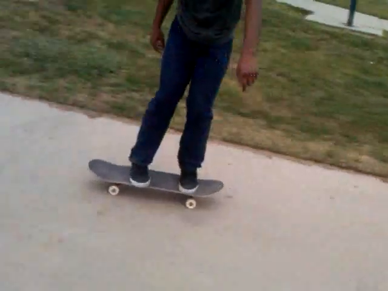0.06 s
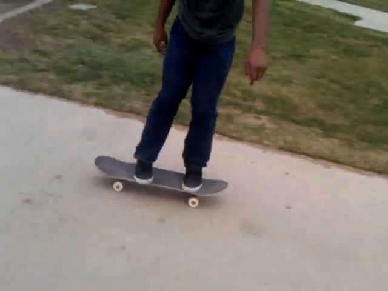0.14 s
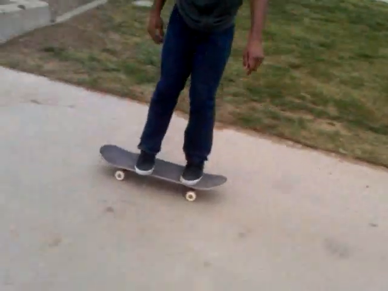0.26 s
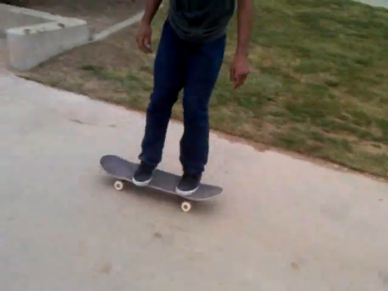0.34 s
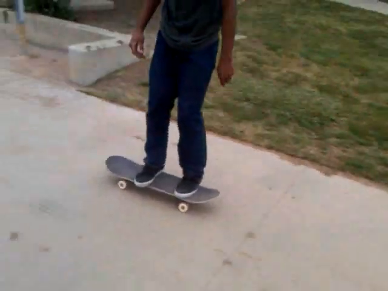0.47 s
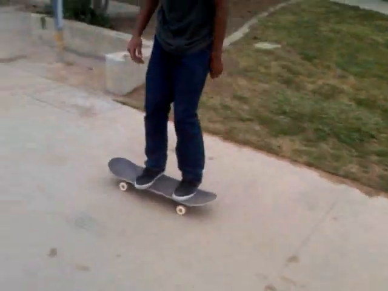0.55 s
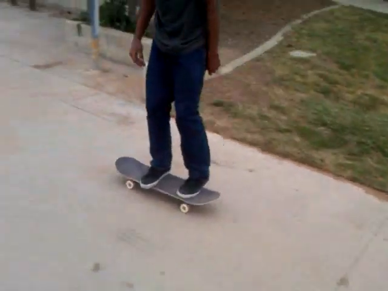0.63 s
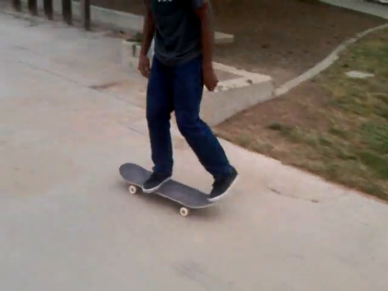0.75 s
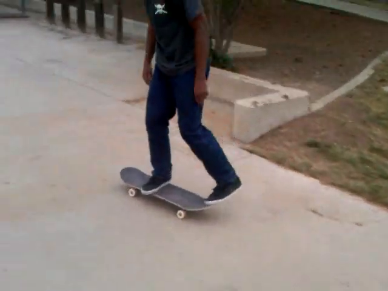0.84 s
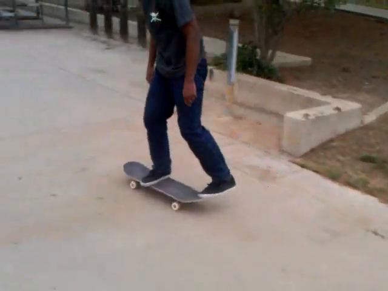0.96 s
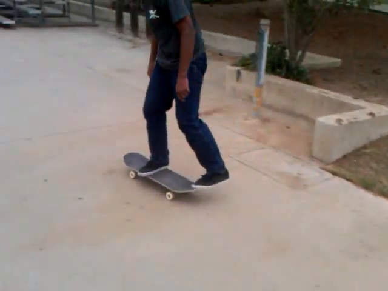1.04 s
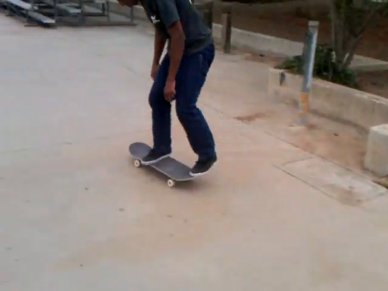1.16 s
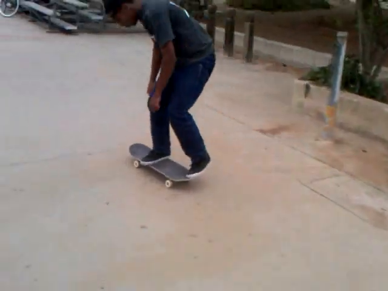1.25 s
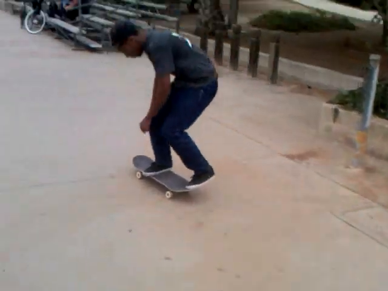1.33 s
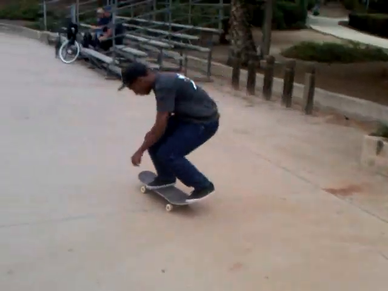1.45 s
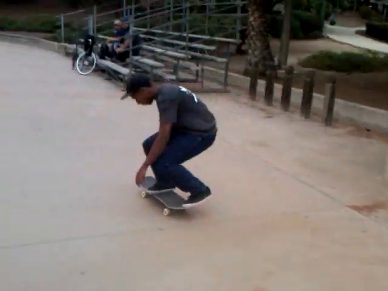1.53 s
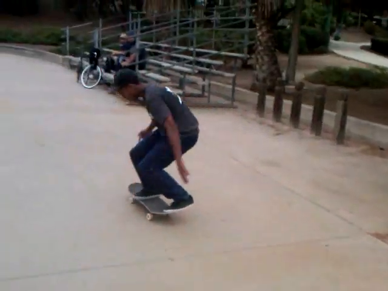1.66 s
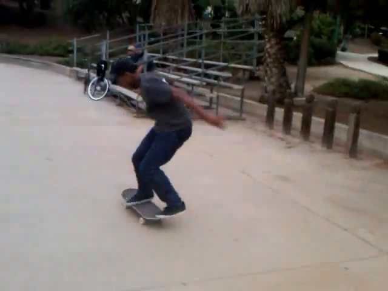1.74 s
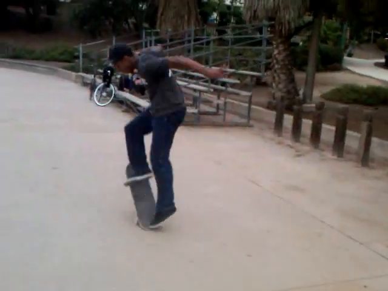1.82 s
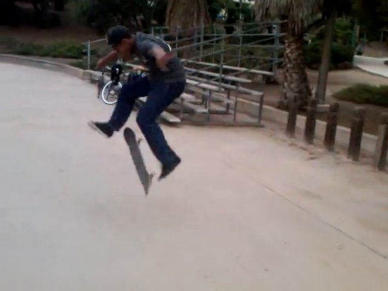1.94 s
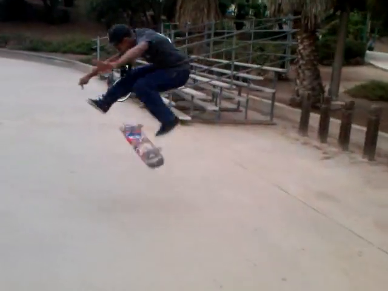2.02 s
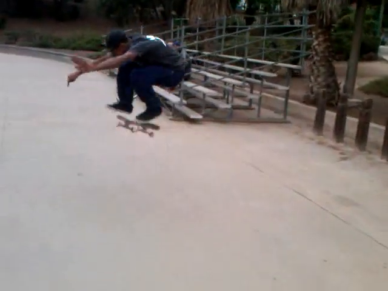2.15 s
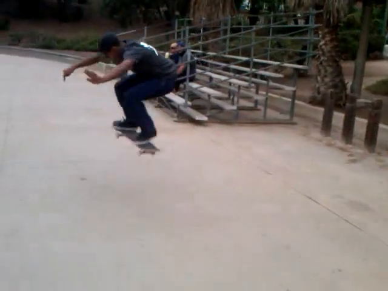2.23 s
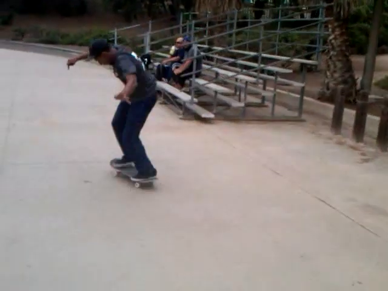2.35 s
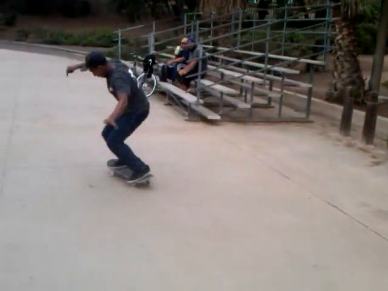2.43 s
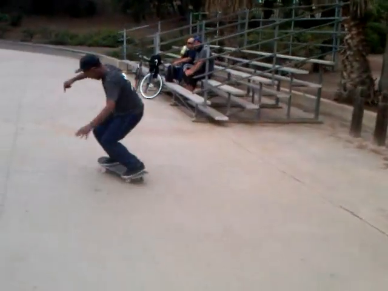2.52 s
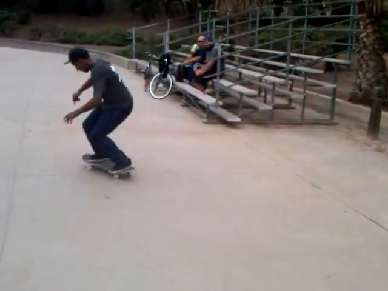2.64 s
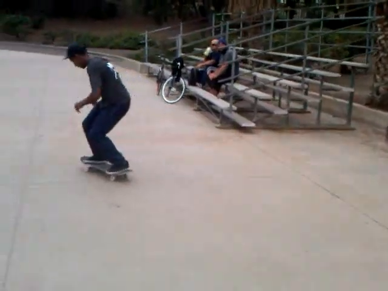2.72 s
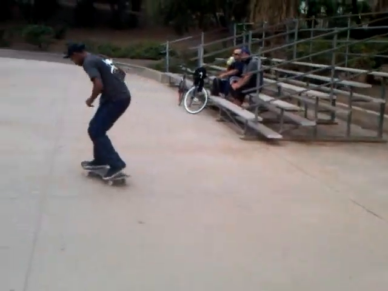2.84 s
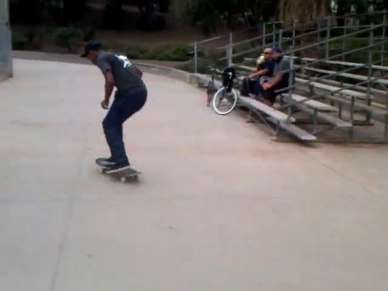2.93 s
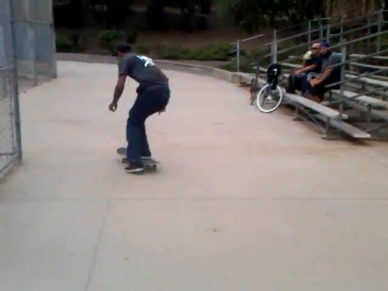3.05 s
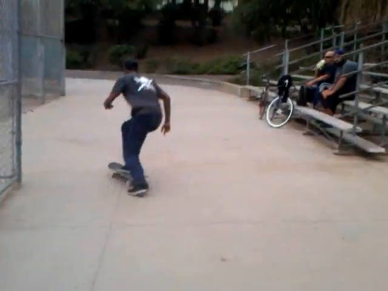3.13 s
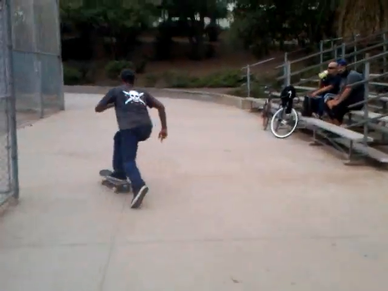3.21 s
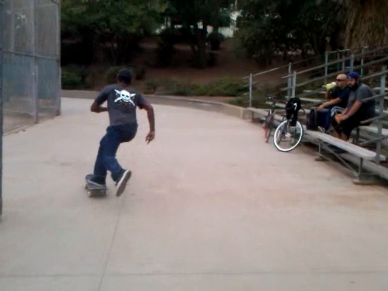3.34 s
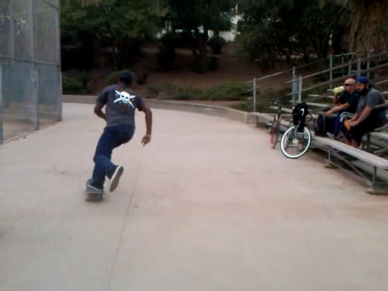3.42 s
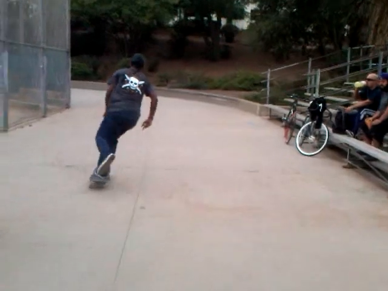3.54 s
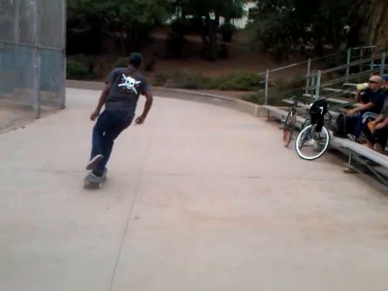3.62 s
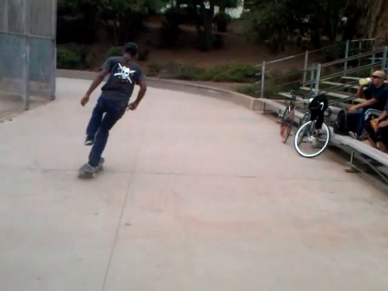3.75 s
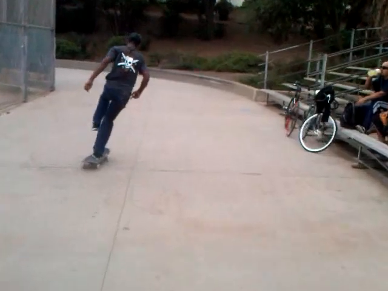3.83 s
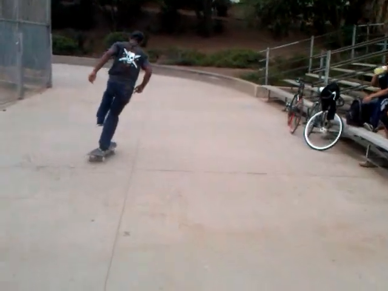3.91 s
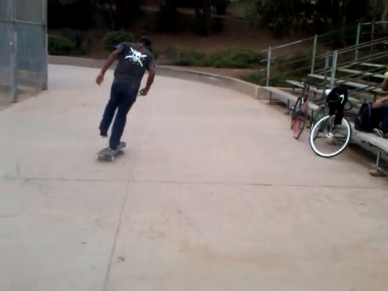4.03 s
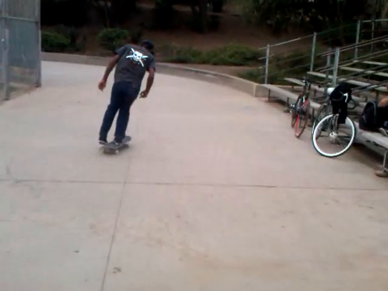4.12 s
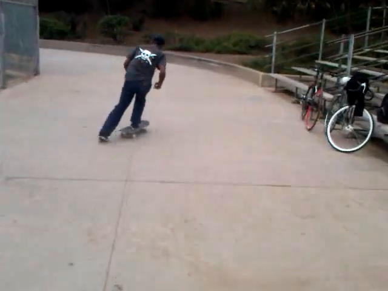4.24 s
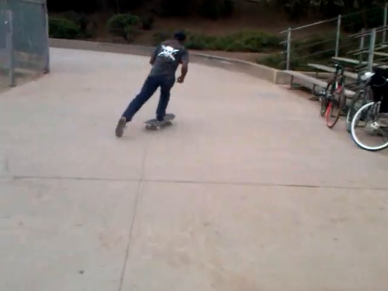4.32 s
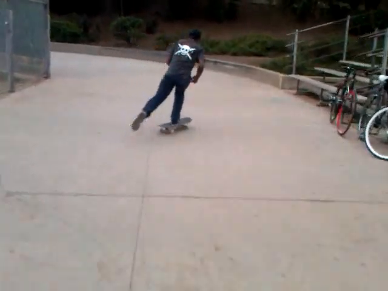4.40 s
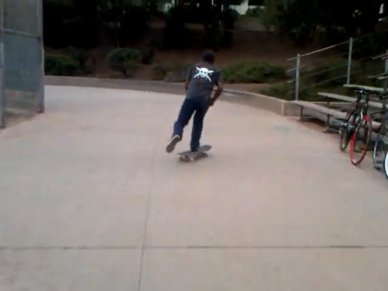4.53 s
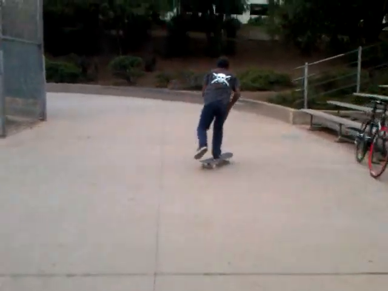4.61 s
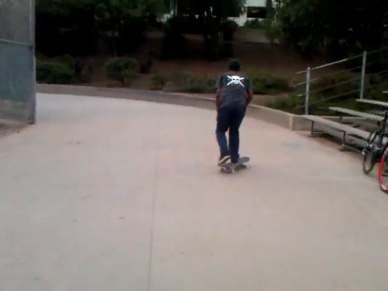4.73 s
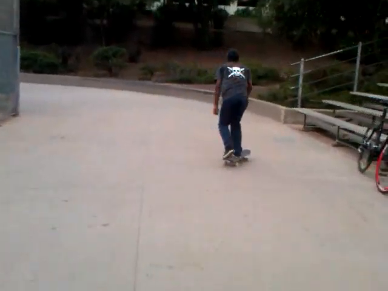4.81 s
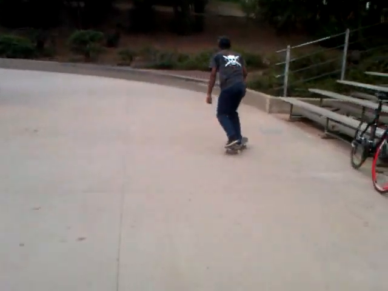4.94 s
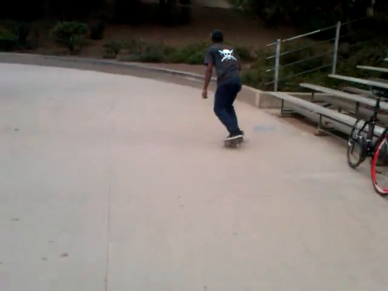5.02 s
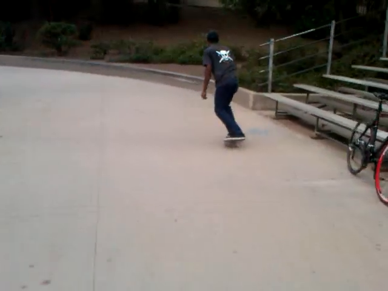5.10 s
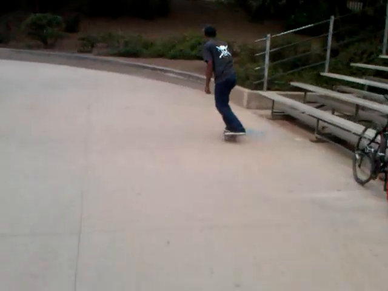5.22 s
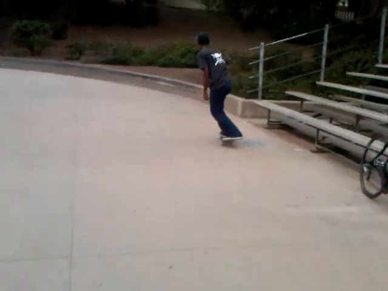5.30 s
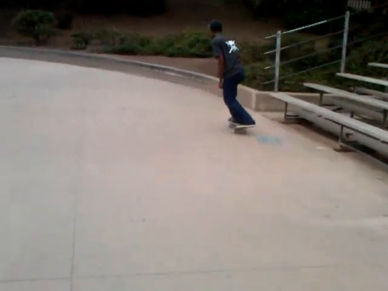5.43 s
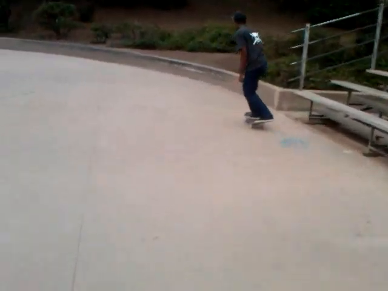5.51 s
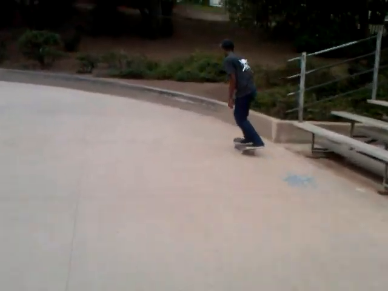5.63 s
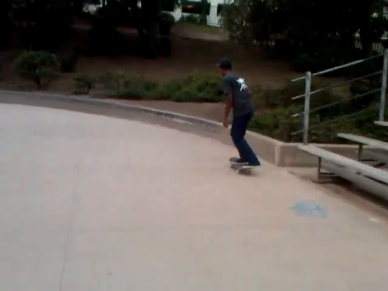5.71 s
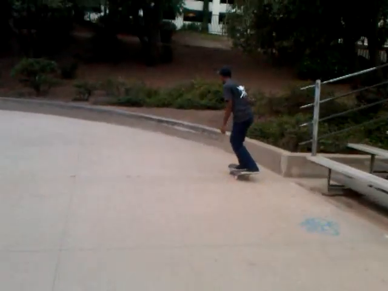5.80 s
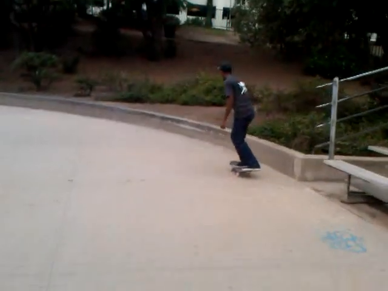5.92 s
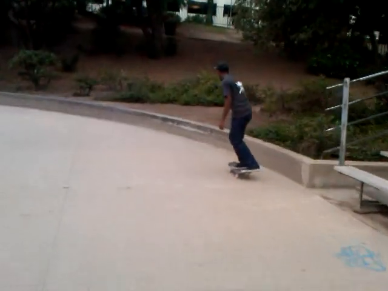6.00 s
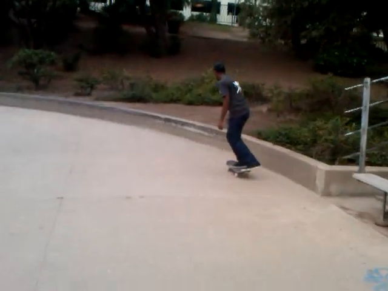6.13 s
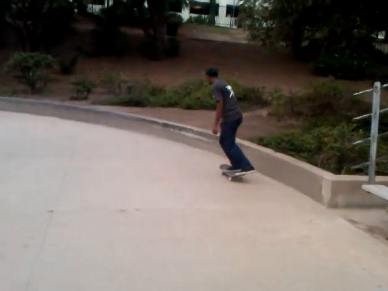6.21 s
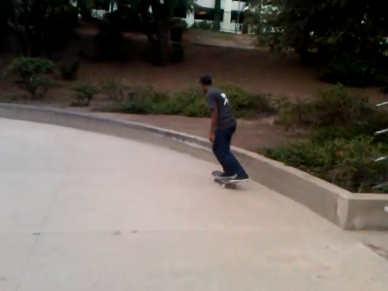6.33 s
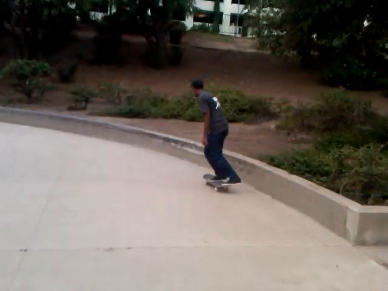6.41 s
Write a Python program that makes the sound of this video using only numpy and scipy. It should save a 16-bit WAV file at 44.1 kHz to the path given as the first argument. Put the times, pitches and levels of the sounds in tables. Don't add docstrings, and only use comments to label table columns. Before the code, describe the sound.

A skateboard's wheels grind quietly over sandy slabs, with a few near knocks and loose metal jingles. A dry crack of the tail, a second of thin whirr, then a cluster of wood and metal clacks as it lands, slapping off nearby walls. Foot scrapes and stronger, louder rumbling follow, joints knocking irregularly. Small camera microphone outdoors, faint low breeze, muffled and slightly broken-up treble.

```python
import sys
import numpy as np
from scipy import signal
from scipy.fft import rfft, irfft
from scipy.io import wavfile
from scipy.ndimage import uniform_filter1d

SR = 44100
rng = np.random.default_rng(int(sys.argv[2]) if len(sys.argv) > 2 else 0)


def makeup_ratio(level_db):
    decades = np.asarray(level_db, float) / 20
    return 10 ** decades


def file_out(sig):
    cols = np.atleast_2d(sig).T
    lim = np.clip(cols, -1, 1)
    pcm = np.round(lim * 32767).astype(np.int16)
    wavfile.write(sys.argv[1], SR, pcm)


N = 284886
TIME = np.arange(N) / SR


def evened(x):
    return x / np.sqrt(np.mean(x ** 2) + 1e-20)


def peaked(x):
    return x / abs(x).max()


def add(mix, s, sound):
    part = mix[round(s * SR):][:len(sound)]
    part += sound[:len(part)]


def coloured(x, points):
    hz, db = np.transpose(points)
    bins = np.fft.rfftfreq(len(x), 1 / SR)
    gain_db = np.interp(np.log(bins + 1), np.log(hz), db, -90, -90)
    return evened(irfft(rfft(x) * makeup_ratio(gain_db), len(x)))


def body(x, modes):
    out = np.zeros(len(x))
    for k, (hz, width, db) in enumerate(modes):
        r = np.exp(-np.pi * 1.5 * width / SR)
        pole = [1, -r * np.exp(2j * np.pi * hz / SR)]
        ring = signal.lfilter([(1 - r) ** 2], np.convolve(pole, pole), x).real
        out += (-1) ** k * makeup_ratio(db) * ring
    return evened(out)


def drift(per_s):
    slow = signal.butter(2, per_s, fs=SR, output="sos")
    return evened(signal.sosfilt(slow, rng.standard_normal(N)))


def grit(per_s, spread_db, bumps_db):
    size = makeup_ratio(spread_db * np.minimum(rng.exponential(1, N), 4)) * rng.choice([-1., 1.], N)
    struck = rng.random(N) < per_s / SR
    return size * struck * makeup_ratio(bumps_db)


# (middle [s], length [s], trucks [dB], deck [dB])
SWELLS_AND_DIPS = [(0, 0.11, -1.5, 7), (0.238, 0.033, -1, 7.5), (1.306, 0.17, 6.5, 4), (1.4, 0.072, 11.5, 0),
                   (1.616, 0.18, 13.5, 1.5), (1.941, 0.083, 4.5, 8), (2.124, 0.1, 14.5, 0.5),
                   (3.2, 0.12, -3.5, 4), (2.8, 0.091, 2, -1), (4.62, .1, 4, -0.5), (5.66, 0.063, 1.5, 2),
                   (6.13, 0.066, 2, 0), (.76, 0.11, -1.5, -2), (3.481, 0.091, -0.5, 5.5),
                   (3.894, 0.048, -1, -1), (4.42, 0.11, 4, -2), (5.152, 0.15, 5, 1.5), (5.43, 0.045, 0, 2),
                   (6.227, 0.043, 2, -1.5), (6.38, 0.034, -0.5, -0.5)]


def swells_and_dips(column):
    return sum(row[column] * np.exp(-(2 * (TIME - row[0]) / row[1]) ** 2) for row in SWELLS_AND_DIPS)


# (frequency [Hz], width [Hz], level [dB])
DECK_MODES = [(137.4, 23, -9), (214.8, 84, -8), (465.9, 47.6, -1.5), (585.7, 119, -2.5)]
# (frequency [Hz], width [Hz], level [dB])
FLEX_MODES = [(280, 45.4, -4.5), (326, 77.3, -6), (427, 82, -5)]
# (frequency [Hz], width [Hz], level [dB])
UPPER_MODES = [(633, 101, -2.5), (757, 138, -2), (877, 86, -4.5)]


def deck_roar(bumps, stones, deck_db, load):
    wood = body(stones, DECK_MODES[2:]) + makeup_ratio(-11 + 15 * load) * body(stones, FLEX_MODES)
    fine = grit(2000., 2.0, 0.24 * bumps + 0.38 * drift(28.0))
    upper = makeup_ratio(deck_db - 8 + 8.5 * load) * body(fine, UPPER_MODES)
    return makeup_ratio(deck_db - 2.0) * wood + upper


# (frequency [Hz], width [Hz], level [dB])
TRUCK_MODES = [(962, 138, -3.5), (1165, 185, 1), (1374, 118, -3), (1483.6, 71, -1.5), (1638, 150, -9.5)]


def truck_clatter(bumps, truck_db):
    shaken = makeup_ratio(truck_db - 2.0) + rattle(column=2, rel_db=-18.5)
    return shaken * body(grit(2500., 2.2, 0.24 * bumps + 1.9 * drift(25.)), TRUCK_MODES)


def streaks(x, modes):
    out = np.zeros(N)
    for hz, width, db in modes:
        out += makeup_ratio(db + 4 * drift(14.)) * body(x, [(hz, width, 0)])
    return evened(out)


# (frequency [Hz], width [Hz], level [dB])
HUM_SIDE_ON = [(547, 24, -3.5), (661, 30, -1.5), (1178, 40, -9.5)]
# (frequency [Hz], width [Hz], level [dB])
HUM_ROLLING_AWAY = [(338, 24, -2.5), (478, 20, -1), (640, 45, -10), (1169.6, 39, -6)]


def hum(sand, away, deck_db):
    near = (1 - away) * makeup_ratio(-4.5) * streaks(sand, HUM_SIDE_ON)
    far = away * makeup_ratio(-2.5) * streaks(sand, HUM_ROLLING_AWAY)
    spinning = np.interp(TIME, (1.5, 1.56, 2.6, 3.2), (0, 1, 1, 0))
    return makeup_ratio(deck_db) * (near + far) + makeup_ratio(-56) * spinning * body(sand, [(1635, 280, 0)])


# (frequency [Hz], level [dB per Hz])
HISS_SIDE_ON = [(1500, -44.5), (1900, -10), (2240, -2.5), (2650, -7), (3050, -12.5), (3400, -5.5),
                (3860, -8), (4300, -1), (4980, -8.5), (5330, -12), (5700, -10), (6310, -7.5), (7300, -13.5),
                (9000, -44)]
# (frequency [Hz], level [dB per Hz])
HISS_ROLLING_AWAY = [(1120, 2.5), (1900, -7.5), (2030, -14), (2200, -7.5), (2290, -14), (2580, -3.5),
                     (2880, -8.5), (3190, -10.5), (3880, -8), (4250, -12), (5150, -13.5), (6490, -14.5),
                     (7300, -18.5), (9490, -50), (16100, -120)]
# (frequency [Hz], width [Hz], level [dB])
BEARING_WHIRR = [(4340, 370, 0.5), (2630, 200, -2)]


def hiss(sand, away, deck_db, sand_db):
    level = makeup_ratio(-35 + 0.39 * deck_db + sand_db) + rattle(column=3, rel_db=-17.5)
    far = coloured(sand, HISS_ROLLING_AWAY) + makeup_ratio(-15.5) * body(sand, BEARING_WHIRR)
    return level * ((1 - away) * coloured(sand, HISS_SIDE_ON) + away * far)


# (time [s], wheel force [dB], truck looseness [dB], grit on the slab [dB])
ROLLING = [(0, -35, 5.5, -3.5), (0.249, -37, 3.5, -5.5), (.6, -42, 5.5, -6), (.84, -40.5, 2.5, -10.5),
           (0.919, -34, 2, -10), (1.5, -37.5, -2.5, -6), (1.72, -35.5, -8, -11), (1.86, -42.5, 1, -9),
           (2.6, -38.5, -6.5, -6.5), (2.78, -42.5, -6.5, -15), (3.1, -42.5, -2, -10), (3.36, -27, -3, -8),
           (3.58, -35.5, 1, -4.5), (4.3, -31.5, -5.5, -3), (4.66, -21, -3.5, -5.5), (4.95, -28.5, -6.5, -6),
           (5.72, -25, -3, -4.5), (6.46, -31, -2, -7)]
# (time [s], load [0-1])
RIDER_LOAD = [
    (0, 0),
    (.9, 0.28),
    (1.5, 0.63),
    (1.9, 0.62),
    (3.1, 0.81),
    (3.6, 0.98),
    (4.4, 0.72),
    (6.46, 0.79),
]
# (from [s], to [s])
TURN_AWAY = (2.43, 2.4)


def rolling():
    s, *levels = np.transpose(ROLLING)
    deck_db, loose_db, sand_db = (np.interp(TIME, s, column) for column in levels)
    truck_db = deck_db + loose_db + swells_and_dips(column=2)
    deck_db = deck_db + swells_and_dips(column=3)
    load = np.interp(TIME, *np.transpose(RIDER_LOAD))
    away = np.interp(TIME, TURN_AWAY, (0, 1))
    bumps = 1.63 * drift(31.0)
    stones = grit(1500., 1.7, bumps)
    sand = grit(9800.0, 3.76, 0.5 * bumps)
    low = makeup_ratio(-21 + 0.66 * deck_db + 5 * (load - 0.95)) * body(stones, DECK_MODES[:2])
    board = low + deck_roar(bumps, stones, deck_db, load) + truck_clatter(bumps, truck_db)
    return board + hum(sand, away, deck_db) + hiss(sand, away, deck_db, sand_db)


# (frequency [Hz], level [dB per Hz])
BASS_COLOUR = [(12, -39), (20, -2), (92, -5), (120, -7.5), (160, -34), (260, -120)]


def breeze():
    s, force_db = np.transpose(ROLLING)[:2]
    level = makeup_ratio(-34 + 0.48 * np.interp(TIME, s, force_db))
    return level * coloured(rng.standard_normal(N), BASS_COLOUR)


# (time [s], deck peak [dB], thud pitch [Hz])
DULL_KNOCKS = [(0.137, -19, 547), (0.173, -22, 560), (.247, -26, 550), (.309, -24.5, 556),
               (0.417, -27, 510), (.909, -24.5, 545), (1.138, -26, 550), (1.342, -23, 594),
               (1.484, -24, 640), (1.6, -26, 900), (1.6325, -14, 595), (1.64, -19, 430), (1.714, -17, 379),
               (2.957, -36, 676), (3.142, -24.5, 490), (3.198, -21.5, 454), (3.288, -14.5, 596),
               (3.328, -15, 600), (3.39, -9, 553), (3.441, -17.5, 466), (3.54, -22.5, 800),
               (3.861, -23.5, 520), (3.991, -14, 417), (4.028, -33, 447), (4.251, -30, 480),
               (4.515, -16.5, 470), (4.773, -9, 700), (4.778, -11.5, 617), (5.101, -19, 659),
               (5.203, -15, 750), (5.381, -16, 456), (5.616, -16.5, 799), (5.899, -11, 320),
               (6.152, -13, 400), (6.229, -14.5, 428), (6.258, -20.5, 470), (6.377, -16.5, 380),
               (6.404, -10.5, 446), (6.412, -9.5, 450), (4.6, -14.5, 480), (4.627, -11.5, 850),
               (4.68, -9, 850), (5.73, -8, 700), (6.033, -17, 600)]
# (time [s], deck peak [dB], truck ring against deck [dB], tick against deck [dB], thud pitch [Hz])
NEAR_JOINTS = [(0.4702, -20, -9, -25, 590), (0.4793, -12.5, -8, -26.5, 526), (0.523, -25, -20, -23, 635),
               (.595, -25.5, -2, -21.5, 219), (3.9633, -16, 3.5, -22, 675), (3.969, -9.5, -1, -23, 690),
               (4.0732, -16.5, -2.5, -26, 378), (4.0786, -18.5, 1, -24, 453), (4.113, -21.5, 4, -23, 447)]
# (time [s], deck peak [dB], truck ring against deck [dB], tick against deck [dB], thud pitch [Hz])
WIDE_CRACKS = [(1.287, -17.5, -3, -21, 540), (1.295, -23, -6, -17.5, 527), (1.403, -21, -1, -15, 670),
               (1.542, -24, -2, -30, 513), (3.523, -8.5, -31, -35, 590), (4.853, -10, -1, -14, 484),
               (4.991, -7.5, -6.5, -19.5, 660), (5.0, -8, -4, -24.5, 824), (5.537, -10.5, -4, -28.5, 760),
               (5.706, -9, -16, -26, 860), (5.7096, -6.5, -15, -11.5, 920), (5.7432, -9.5, -24, -33, 750),
               (5.7972, -6.5, -8, -12, 690), (5.8036, -12.5, -8, -17, 605), (5.8093, -19, -6, -12, 500),
               (5.997, -9, -7.5, -24, 810), (6.0005, -12, -1.5, -20, 830), (6.1022, -5.5, -7.5, -23, 860),
               (6.116, -13, -5, -26, 796)]
# (time [s], deck peak [dB], truck ring against deck [dB], tick against deck [dB], thud pitch [Hz])
TRICK_BLOWS = [(2.0622, -15, 2, -1.5, 420), (2.068, -19.5, 4, -9, 490), (2.0742, -23, 10, -23, 487),
               (2.47, -30.5, -4, -16, 527), (2.5629, -9, -4, -18.5, 438), (2.567, -10.5, 0, -22, 417),
               (2.572, -11.5, -0.5, -15.5, 430), (2.586, -10, -1, -26, 547), (2.5965, -15.5, -4, -12, 486),
               (2.6021, -14.5, 4, -10, 483), (2.608, -17, 0, -14, 516), (2.627, -18.5, 7, -22, 450),
               (2.638, -19, 4.5, -18, 480), (2.647, -28, 0, -14, 378), (2.655, -26, 2, -14, 420),
               (2.664, -27, -1, -15, 450), (2.68, -27, -9, -23, 447), (2.704, -29, -2, -23, 450)]


def every_blow():
    dull = [(s, db, -19.5, -40, hz) for s, db, hz in DULL_KNOCKS]
    kinds = (TRICK_BLOWS, -14), (NEAR_JOINTS, 2), (WIDE_CRACKS + dull, -29.5)
    return [(*row, row[3] + chink_db) for rows, chink_db in kinds for row in rows]


# (frequency [Hz], level [dB per Hz])
TICK_COLOUR = [(1120, -13), (1900, 6.5), (2760, 5.5), (3360, 0), (4060, 2), (4680, -6.5), (5150, -8),
               (6670, -17), (7300, -17.5), (9490, -62), (16100, -120)]
# (frequency [Hz], width [Hz], level [dB])
CHINK_MODES = [(4320, 1400, -0.5), (6060, 450, 12.5), (6300, 1300, 6.5)]


def blows():
    out = np.zeros(N)
    t = TIME[:SR // 8]
    fall = makeup_ratio(-60 * t / 0.022)
    lead = .012
    late = t - lead - .003
    burst = makeup_ratio(-60 * np.where(late > 0, late / .005, late / 0.0028) ** 2)
    burst += makeup_ratio(-20.5 - 20 * (late / .009) ** 4)
    burst += 0.045 * (late > 0) * makeup_ratio(-60 * late / 0.1)
    edge = 1. * (np.arange(len(t)) == round((lead + .003) * SR))
    wood = DECK_MODES + FLEX_MODES + UPPER_MODES
    for s, db, truck_db, tick_db, hz, chink_db in every_blow():
        shake, crack = rng.standard_normal((2, len(t)))
        onset = np.sin(np.minimum(t / 0.00084, 1) * np.pi / 2) ** 2
        thud = np.sin(2 * np.pi * hz * t) * makeup_ratio(-60 * t * hz / 9.8) * onset
        deck = peaked(thud + 0.36 * peaked(body(shake * fall, wood)))
        trucks = peaked(body(shake * fall, TRUCK_MODES))
        tick = peaked(coloured(crack + 4.3 * edge, TICK_COLOUR) * burst)
        chink = peaked(body(shake, CHINK_MODES) * burst)
        add(out, s + 0.001795, makeup_ratio(db + 2.5) * deck)
        add(out, s + 0.001, makeup_ratio(db + truck_db + 1.0) * trucks)
        add(out, s + 0.0005 - lead, makeup_ratio(db + tick_db + 6.0) * tick)
        add(out, s + 0.00046 - lead, makeup_ratio(db + chink_db + 4.0) * chink)
    return signal.sosfilt(signal.butter(2, 100., "high", fs=SR, output="sos"), out)


# (time [s], peak [dB], pitch [Hz])
WEIGHT_THUMPS = [(0.254, -28, 192), (0.415, -27, 220), (0.476, -18, 218), (0.521, -27, 154),
                 (0.596, -28, 227), (2.064, -19, 260), (2.565, -16, 262), (2.59, -17, 212),
                 (3.965, -32, 173), (4.855, -20, 244), (4.875, -19.5, 129), (5.8, -27, 123),
                 (5.858, -14, 197), (5.902, -16, 216)]


def thumps():
    out = np.zeros(N)
    t = TIME[:SR // 8]
    shape = np.minimum(t / 0.0031, 1) * makeup_ratio(-60 * t / 0.073)
    for s, db, hz in WEIGHT_THUMPS:
        add(out, s, makeup_ratio(db - 2.5) * peaked(np.sin(2 * np.pi * hz * t) * shape))
    return out


def rattle(column, rel_db):
    out = np.zeros(N)
    t = TIME[:SR // 2]
    for row in TRICK_BLOWS + NEAR_JOINTS + WIDE_CRACKS:
        level = makeup_ratio(row[1] + row[column] + rel_db - 60 * t / 0.14)
        add(out, row[0], level * np.minimum(t / 0.00057, 1))
    return out


# (time [s], peak [dB], pitch [Hz], time to fall 60 dB [s])
NUT_PINGS = [(.478, -39, 2230, 0.057), (.522, -43, 2200, 0.044), (1.369, -38, 2540, 0.054),
             (1.382, -40, 2480, 0.066), (3.388, -41, 2470, 0.042), (4.076, -36.5, 2140, 0.069),
             (4.995, -36, 4030, 0.03), (5.803, -22.5, 4040, 0.035), (5.999, -36.5, 4020, 0.033)]


def pings():
    out = np.zeros(N)
    t = TIME[:SR // 8]
    for s, db, hz, t60 in NUT_PINGS:
        ring = body(rng.standard_normal(len(t)), [(hz, 90., 0)])
        add(out, s, makeup_ratio(db - 60 * t / t60) * ring * np.minimum(t / .004, 1))
    return out


# (middle [s], length [s], level [dB])
SHOE_SCUFFS = [
    (1.393, .054, -38),
    (3.296, 0.12, -25),
    (4.402, 0.1, -35.5),
    (4.64, 0.12, -29),
    (5.708, 0.097, -21.5),
]
# (frequency [Hz], level [dB per Hz])
SOLE_COLOUR = [(350, -17.5), (600, -26), (800, -1.5), (976, -14), (1330, -9.5), (1810, -20), (1940, -31.5),
               (2260, -26), (3300, -37.5), (5000, -55.5), (7700, -120)]


def scuffs():
    stroke = sum(makeup_ratio(db) * np.exp(-(2 * (TIME - s) / length) ** 2) for s, length, db in SHOE_SCUFFS)
    return stroke * coloured(grit(7100.0, 1.2, 0.8 * drift(50.0)), SOLE_COLOUR)


# (start [s], deck [dB], trucks [dB], treble [dB], hold [s], time to fall 60 dB [s])
WALL_SLAPS = [
    (2.073, -33, -32.5, -42, 0.059, 0.1),
    (2.605, -25, -26, -42, 0.043, 0.3),
]


def slaps():
    out = np.zeros(N)
    t = TIME[:SR // 2]
    wood = DECK_MODES + FLEX_MODES + UPPER_MODES
    for s, deck_db, truck_db, treble_db, hold, t60 in WALL_SLAPS:
        a, b, c = rng.standard_normal((3, len(t)))
        shape = np.minimum(t / 0.0034, 1) * makeup_ratio(-60 * np.maximum(t - hold, 0) / t60)
        echo = makeup_ratio(deck_db) * body(a, wood) + makeup_ratio(truck_db) * body(b, TRUCK_MODES)
        add(out, s, shape * (echo + makeup_ratio(treble_db) * coloured(c, TICK_COLOUR)))
    return out


def scene():
    board = rolling() + blows() + thumps() + pings()
    return (board + breeze() + scuffs() + slaps())[None]


def thinned(x, size, width, hold, drop_db, starved):
    hz, t, z = signal.stft(x, SR, nperseg=size)
    lines = np.arange(len(hz))
    group = np.minimum(lines // width * width + width // 2, len(hz) - 1)
    block = np.arange(len(t)) // hold * hold
    power = uniform_filter1d(abs(z) ** 2, size=width, axis=0)
    power = uniform_filter1d(power, size=hold, axis=1)[group][:, block]
    level_db = 10 * np.log10(power + 1e-16)[np.minimum(lines, np.searchsorted(hz, 7100))]
    around_db = uniform_filter1d(level_db, size=size // 22, axis=0)
    luck = rng.random(power.shape)[group][:, block]
    hz = hz[:, None]
    limit_db = around_db + drop_db + 5 * (luck - .5) + 2 * np.log2(hz / 4000. + 1e-3)
    keep = (level_db > limit_db) | (hz < 2600)
    frame_db = level_db[hz[:, 0] > 2600].mean(axis=0)
    keep = keep | ((frame_db > uniform_filter1d(frame_db, size=31) + 7) & (luck > .1))
    for a, b, above_hz in starved:
        unlucky = (luck > .2) | (above_hz < 1500)
        keep = keep & ~((hz > above_hz) & (t > a) & (t < b) & unlucky)
    return signal.istft(z * keep, SR, nperseg=size)[1][:N]


# (time [s], peak [dB])
STRAY_BLIPS = [(.599, -77), (1.303, -74), (1.75, -81), (2.069, -64), (2.199, -81), (2.263, -80),
               (2.582, -67), (3.991, -68), (5.014, -71), (5.718, -66)]


def blips():
    out = np.zeros(N)
    size = 480
    tone = np.hanning(size) * np.sin(2 * np.pi * 8000 * TIME[:size])
    for s, db in STRAY_BLIPS:
        add(out, s - .002, makeup_ratio(db) * tone)
    return out


# (from [s], to [s], above [Hz])
STARVED_TREBLE = [(.497, .518, 4800), (.535, .545, 2000), (1.25, 1.278, 2600), (1.335, 1.345, 5000),
                  (2.02, 2.054, 1450), (2.13, 2.144, 3000), (2.524, 2.556, 1400), (2.704, 2.72, 2200),
                  (3.937, 3.958, 3000), (4.05, 4.068, 5200), (4.825, 4.845, 3000), (4.866, 4.893, 2600),
                  (4.958, 4.98, 2000), (5.01, 5.025, 4400), (5.665, 5.685, 3000), (5.685, 5.702, 4900),
                  (5.72, 5.728, 4500), (5.775, 5.79, 5800), (5.817, 5.855, 3200), (5.98, 5.995, 5000),
                  (6.04, 6.096, 4300)]
# (from [s], to [s])
CALM_SPANS = [(.28, .42), (.9, 1.2), (1.76, 1.98), (2.25, 2.44), (2.8, 3.05), (3.56, 3.83), (4.17, 4.35),
              (4.46, 4.65), (5.3, 5.5), (5.87, 5.97), (6.19, 6.37)]


def patchy_treble(x):
    def filtered(y, taps, edges_hz, lowpass):
        kernel = signal.firwin(taps, edges_hz, pass_zero=lowpass, window=("kaiser", 10), fs=SR)
        return signal.oaconvolve(y, kernel, "same")

    low = filtered(x, 1201, 1400, True)
    treble = filtered(x, 1201, [1400, 7350], False)
    calm = uniform_filter1d(sum((TIME > a) * (TIME < b) * 1. for a, b in CALM_SPANS), size=900)
    lines = thinned(treble, size=4096, width=1, hold=1, drop_db=2, starved=[])
    blocks = thinned(treble, size=512, width=4, hold=3, drop_db=-1.7, starved=STARVED_TREBLE)
    top = calm * lines + (1 - calm) * blocks
    mirrored = 2 * top * np.cos(2 * np.pi * 16000 * TIME)
    folded = filtered(mirrored, 801, [8550, 8950], False)
    return low + top + makeup_ratio(-30) * folded + blips()


def roll_off(x):
    return signal.sosfilt(signal.butter(12, 8980, fs=SR, output="sos"), x)


def record(dry):
    x = 0.89 * np.tanh(dry[0] / 1.307)
    mix = patchy_treble(x)[None] + 0.0013
    return roll_off(mix)


dry = scene()
out = record(dry)
file_out(out)
```